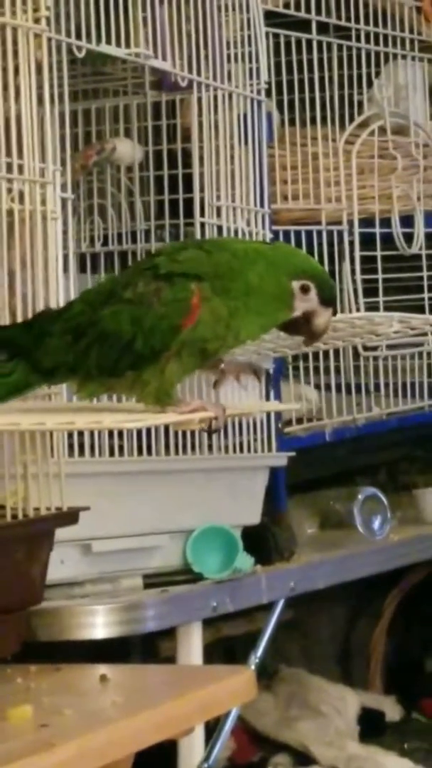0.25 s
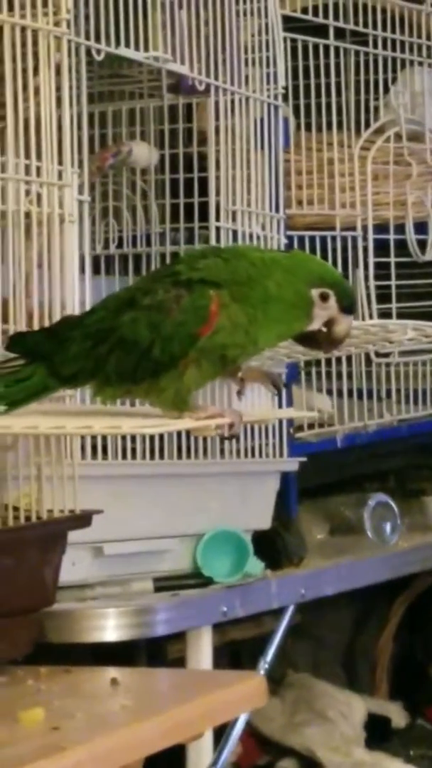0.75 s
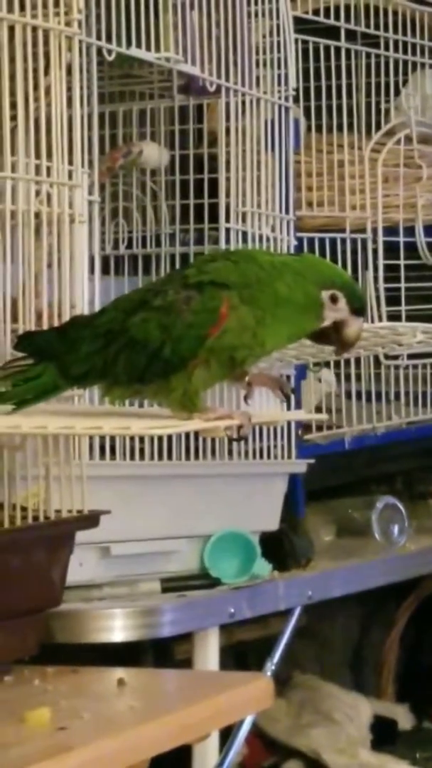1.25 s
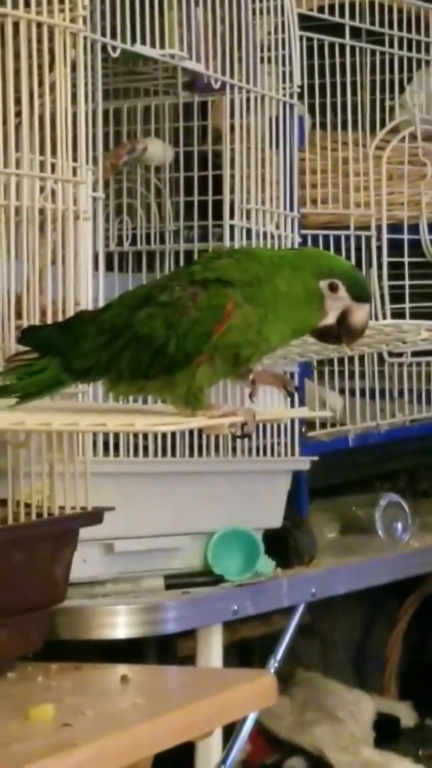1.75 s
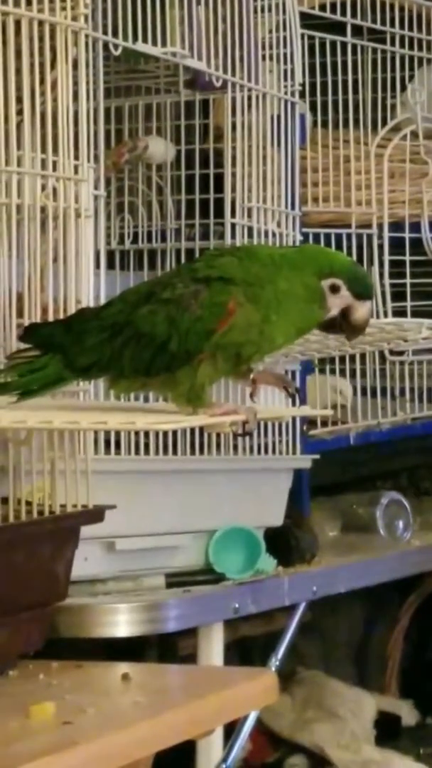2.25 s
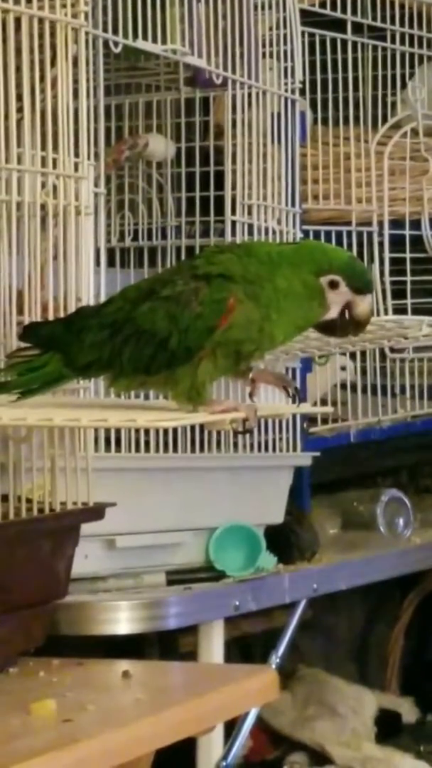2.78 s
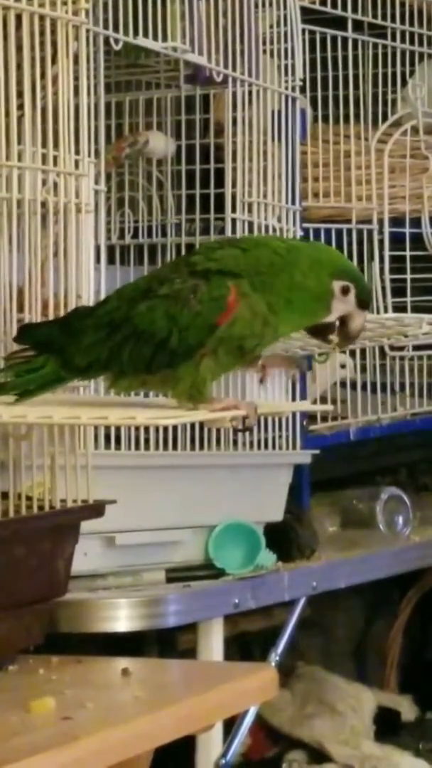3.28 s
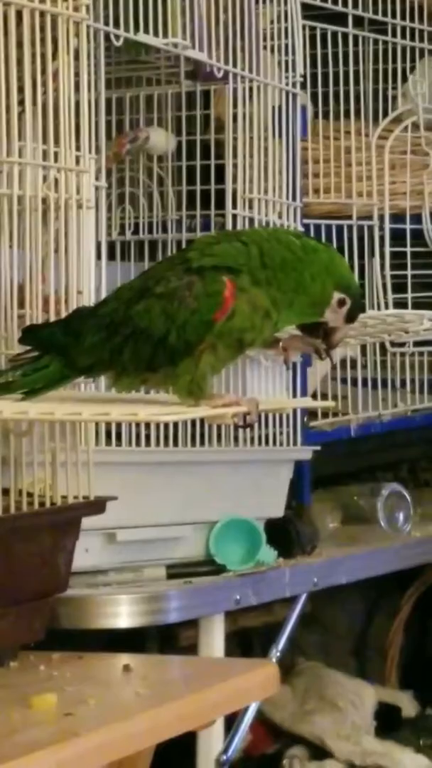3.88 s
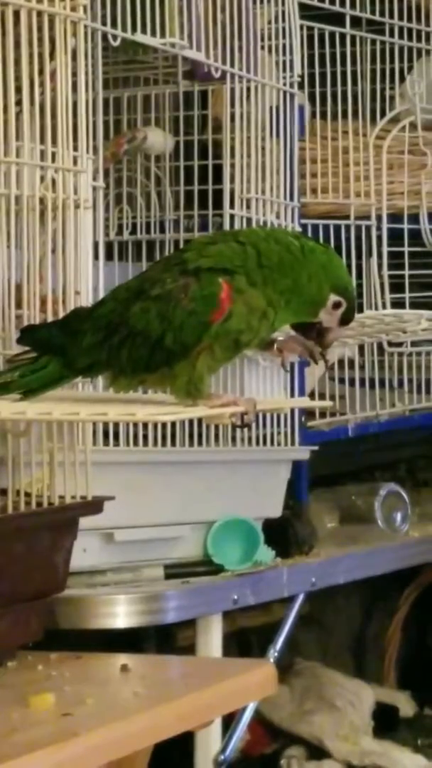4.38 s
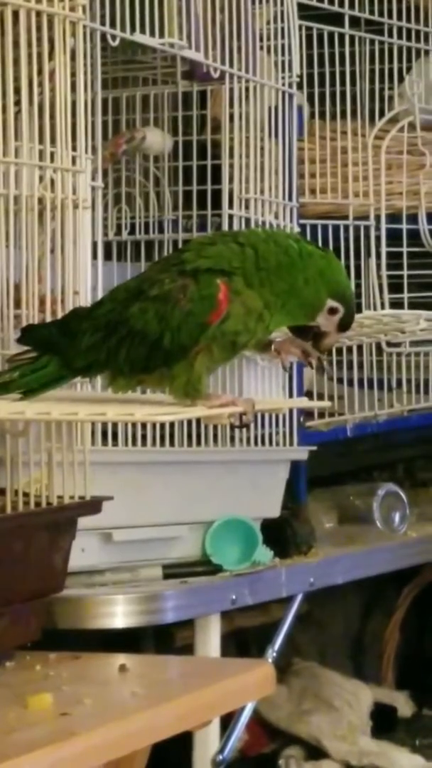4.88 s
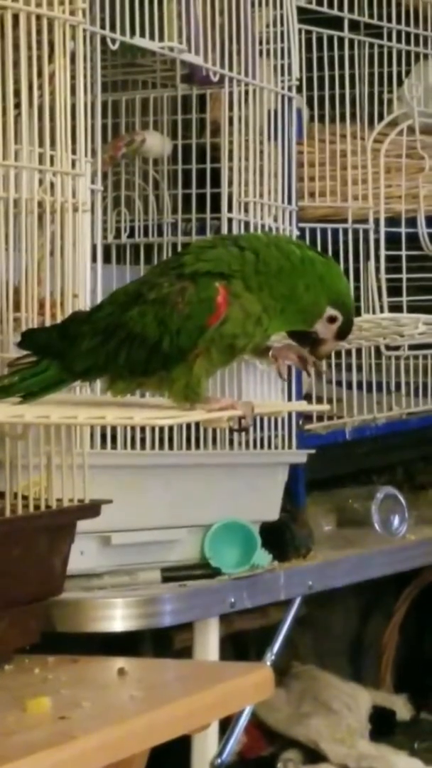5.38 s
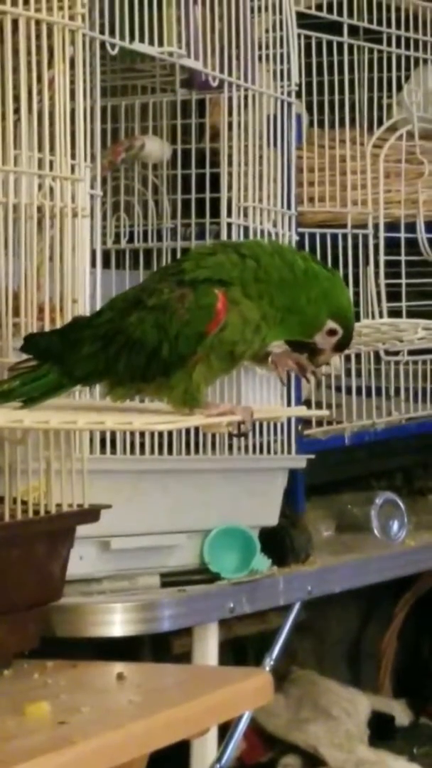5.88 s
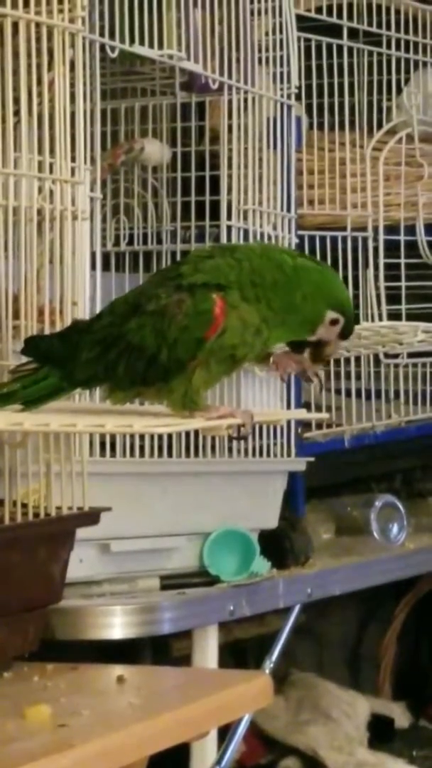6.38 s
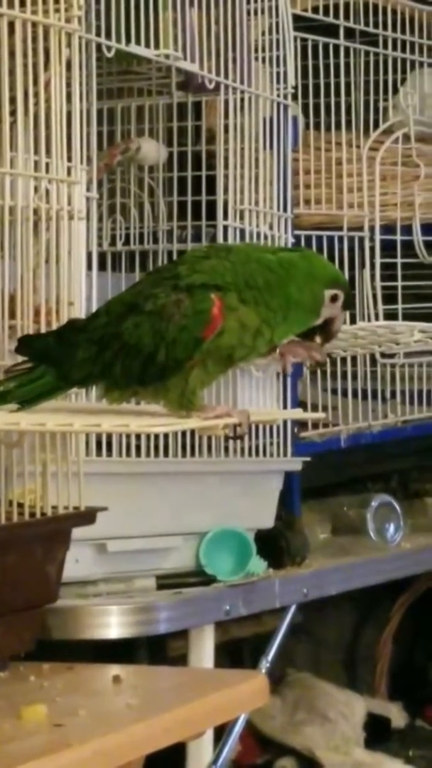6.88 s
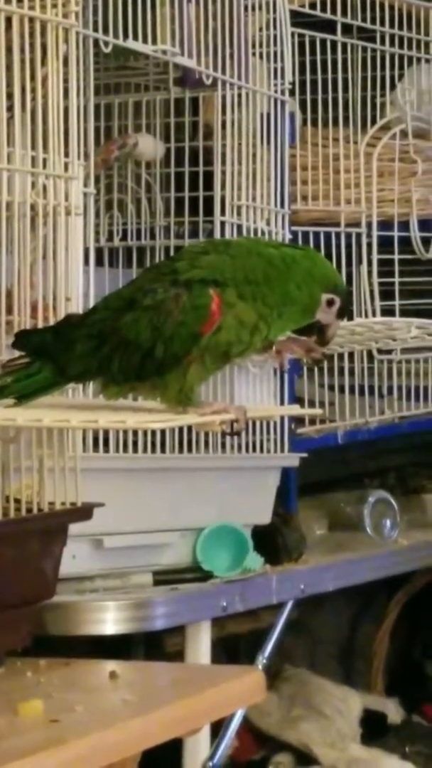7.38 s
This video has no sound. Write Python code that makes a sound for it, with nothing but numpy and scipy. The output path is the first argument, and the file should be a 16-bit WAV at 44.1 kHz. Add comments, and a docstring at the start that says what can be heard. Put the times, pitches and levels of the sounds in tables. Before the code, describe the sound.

Stereo, close view of a parrot eating in a quiet room with a low distant hum. Dry husk crackles and tiny beak ticks come irregularly, the sharpest tick near three seconds. A dove, coloured by the room's resonance, finishes one coo and then calls three times: short hoot, soft intake, long rolling coo. A loud perch knock lands during the last short hoot, and a scraping crack closes.

```python
"""A room of bird cages: air and a far machine hum run throughout; the end of a dove's coo opens the scene.
Three calls follow, each a short falling note, a faint in-drawn hum and a long throbbing coo: a near sine
whose pitch crosses the room's resonances. Around them a parrot near the microphones cracks seeds, knocks
and ticks (noise bursts, short sines), and after 5 s strikes its perch hard, ringing decaying modes and cage.
Noise bursts are cut off at set lengths; the dove's ringing is shut off once weak."""
import sys
import numpy as np
from scipy import signal
from scipy.fft import rfft, irfft
from scipy.io import wavfile
from scipy.ndimage import uniform_filter1d

SR = 44100
rng = np.random.default_rng(int(sys.argv[2]) if len(sys.argv) > 2 else 0)


def master(y):
    """Save y as 16-bit WAV."""
    cut = np.clip(np.atleast_2d(y).T, -1, 1)
    pcm = np.round(cut * 32767)  # scale
    wavfile.write(sys.argv[1], SR, pcm.astype(np.int16))


N = 336924

# short dove notes: start t/s, time stretch/1, pitch shift/Hz, level shift/dB
SHORT_NOTES = [(1.044, 0.953, 18.65, -0.059), (3.196, 0.869, 12.56, 1.23), (5.416, 0.89, 14.28, 2.664)]


def amp(db):
    """Decibels to gain."""
    return 10 ** (np.asarray(db) / 20)


def evened(x):
    """Scales to rms 1."""
    return x / np.sqrt(np.mean(x ** 2) + 1e-20)


def read(points, hz):
    """Interpolates a table on a log-frequency axis."""
    f, value = np.transpose(points)
    return np.interp(np.log(hz + 1), np.log(f + 1), value)


def sides(pan_db):
    """Left and right gains for a left-right level difference."""
    return amp(np.array([pan_db / 2, -pan_db / 2]))


def add(mix, start_s, sound):
    """Mixes a two-channel sound in at a start time."""
    part = mix[:, max(round(start_s * SR), 0):][:, :sound.shape[1]]
    part += sound[:, :part.shape[1]]


def burst(colour, t60_s, length_s, rise_s, same, lumpy_db=3.5):
    """Noise of uneven colour and flickering level that rises, dies away and is cut off at its length."""
    grain_db, fade_s = 2, .005
    t = np.arange(12288) / SR
    a, b, grain, lumps = rng.standard_normal((4, len(t)))
    pair = np.array([a, same * a + np.sqrt(1 - same ** 2) * b])  # same: left-right likeness
    hz = np.fft.rfftfreq(len(t), 1 / SR)
    uneven = amp(lumpy_db * evened(uniform_filter1d(lumps, 45))[:len(hz)])
    noise = evened(irfft(rfft(pair) * colour(hz) * uneven, len(t)))
    flicker = amp(grain_db * evened(uniform_filter1d(grain, 120)))
    rise = np.minimum(t / max(rise_s, 1e-4), 1)
    decay = amp(-60 * t / t60_s)
    cut = 1 / (1 + np.exp(np.clip((t - length_s) / fade_s, -30, 30)))
    return noise * flicker * rise * decay * cut


def air():
    """Room air: random short-time spectra in drifting patches, none below 120 Hz."""
    # spectrum of the air: f/Hz, relative density level/dB
    air_spectrum = [(65, -28), (110, 2), (124, -14), (146, -1), (266, -8.5), (294, -5), (375, -24),
                    (398, -13), (496, -17.5), (907, -28.5), (1500, -32), (11400, -40), (13400, -37)]
    # left-right likeness: f/Hz, likeness/1
    air_likeness = [(60, 1), (200, .996), (400, .98), (700, .8), (1300, .46), (13000, .48)]
    level_db, patchy_db = -62.3, 2.2
    frames, hz = N // 256 + 5, np.fft.rfftfreq(1024, 1 / SR)
    a, b, c, d, patches = rng.standard_normal((frames, 513, 5)).T
    patches = evened(uniform_filter1d(uniform_filter1d(patches, 4, 0), 5, 1))
    same = np.clip(read(air_likeness, hz), -1, 1)[:, None]
    left = a + 1j * b
    right = same * left + np.sqrt(1 - same ** 2) * (c + 1j * d)
    gain = amp(read(air_spectrum, hz)[:, None] + patchy_db * patches) * (hz > 120)[:, None]
    pair = signal.istft(np.array([left, right]) * gain, nperseg=1024, noverlap=768)[1][:, :N]
    return amp(level_db) * evened(pair)


def hum():
    """Far machine: sines whose pitch and level waver at random, over soft low-passed rumble."""
    # hum lines: f/Hz, level/dB, waver/Hz (rms; the same number is the level swell in dB)
    hum_lines = [(59, -60.5, .4), (99.2, -65.5, 1.6), (209, -78, 2.1), (296.7, -70.5, 1.8), (410, -80, 4.9),
                 (502, -79, 4.6)]
    rumble_db = -72.5
    hz, out = np.fft.rfftfreq(N, 1 / SR), np.zeros(N)
    waver_band = (hz > 1.5) * (hz < 25)
    for f, db, waver_hz in hum_lines:
        swell, drift = (evened(irfft(rfft(v) * waver_band, N)) for v in rng.standard_normal((2, N)))
        phase = 2 * np.pi * np.cumsum(f + waver_hz * drift) / SR
        out += amp(db + waver_hz * swell) * np.sqrt(2) * np.sin(phase)
    rumble_colour = (hz > 20) * (hz < 125) * (hz / 60) ** 0.65
    rumble = irfft(rfft(rng.standard_normal(N)) * rumble_colour, N)
    return out + amp(rumble_db) * evened(rumble)


def melody():
    """Lays the shared note shapes out call by call; returns one table (t/s, f/Hz, level/dB) a note."""
    # short note before stretch and shifts: t/s after start, f/Hz, level/dB
    short_shape = [(0.002, 535.2, -44.76), (0.023, 606.3, -15.47), (0.036, 693.6, -31.22),
                   (0.06, 658.5, -32.66), (0.118, 635.9, -22.72), (0.222, 593.8, -20.77),
                   (0.229, 545.1, -32.28), (0.298, 533.5, -54.13)]
    # long coo climbing to its pitch: t/s after start, f/Hz, level/dB
    climb_shape = [(-0.007, 429.0, -54.46), (0.022, 443.3, -34.17), (0.084, 468.8, -28.77),
                   (0.096, 462.2, -33.99), (0.112, 503.5, -28.77), (0.143, 476.9, -36.75),
                   (0.151, 555.8, -22.95), (0.171, 606.4, -16.1)]
    # long coo dropping away: t/s after drop begins, pitch shift/Hz, level shift/dB
    drop_shape = [(-0.017, -19.34, 8.045), (0.03, -48.18, -4.969), (0.033, -107.8, -11.37),
                  (0.048, -102.2, -19.53), (0.101, -111.7, -19.91), (0.108, -143.9, -32.71),
                  (0.154, -166.4, -44.77)]
    # long coos: start t/s, crest t/s, f/Hz, level/dB, bend t/s, f/Hz, drop t/s, f/Hz, level/dB
    coos = [(-0.81, -0.25, 620.0, -8.974, -0.094, 582.4, 0.086, 596.6, -20.79),
            (1.474, 2.019, 624.3, -14.39, 2.27, 590.9, 2.366, 594.6, -19.14),
            (3.608, 4.225, 612.6, -15.07, 4.282, 603.1, 4.464, 593.5, -19.7),
            (5.834, 6.384, 618.0, -15.02, 6.598, 602.3, 6.694, 596.9, -21.89)]
    notes = [np.array(short_shape) * [stretch, 1, 1] + [s, hz, db] for s, stretch, hz, db in SHORT_NOTES]
    for s, crest_s, crest_hz, crest_db, bend_s, bend_hz, drop_s, drop_hz, drop_db in coos:
        climb = np.add(climb_shape, [s, 0, 0])
        hold = [(crest_s, crest_hz, crest_db), (bend_s, bend_hz, (crest_db + drop_db) / 2)]
        drop = np.add(drop_shape, [drop_s, drop_hz, drop_db])
        notes.append(np.vstack([climb, hold, drop]))
    return sorted(notes, key=lambda note: note[0, 0])


def resonate(x, hz, width_hz):
    """One fixed resonance of gain 1, at least 7 Hz wide, for a complex tone."""
    pole = np.exp((2j * hz - max(width_hz, 7)) * np.pi / SR)
    return signal.lfilter([1 - abs(pole)], [1, -pole], x)


def room(x):
    """Direct sound plus ringing modes, different at each microphone."""
    # modes around the coo: f/Hz, width/Hz (7 at least), left gain/1, right gain/1; sign = polarity
    room_modes = [(444.4, 7.103, 0.832, 0.468), (465.0, 9.833, -0.337, -1.088),
                  (475.7, 6.861, 1.381, 0.867), (500.0, 6.568, 2.051, 3.225), (515.9, 22.26, 1.744, 2.358),
                  (543.1, 11.9, 1.047, 1.504), (568.2, 29.54, 0.903, 0.693), (589.8, 18.62, 0.997, 1.296),
                  (607.0, 15.37, 0.063, -0.146), (626.4, 23.88, 0.689, 0.797), (648.0, 21.1, 0.831, 1.131),
                  (671.2, 7.044, 1.013, 1.155), (684.2, 11.1, 3.267, 3.131), (718.9, 24.26, 0.485, 0.805)]
    # direct sound: left and right level/dB
    direct_db = [-3.3, -7.6]
    turn_rad, lag_rad = 2.57, -.3  # ahead of the ring; half the left-right phase offset
    phase = turn_rad + np.array([-lag_rad, lag_rad])
    out = np.outer(amp(direct_db) * np.exp(1j * phase), x)
    for hz, width_hz, left, right in room_modes:
        out += np.outer([left, right], resonate(x, hz, width_hz))
    return out


def dove():
    """Near sine, throbbing as it crosses room modes; a 100-per-second flutter, octave and breath ride on it."""
    # rolling pitch sags: t/s, depth/Hz (negative lifts), 1/e half-width/s
    sags = [(1.667, 15.23, 0.023), (1.722, 61.75, 0.009), (1.779, 58.95, 0.014), (1.833, 67.0, 0.01),
            (1.906, 128.6, 0.013), (1.978, 98.64, 0.018), (2.122, 62.17, 0.014), (2.159, 95.51, 0.017),
            (3.803, 36.97, 0.014), (3.861, 61.32, 0.008), (3.915, 57.81, 0.01), (3.981, 83.5, 0.012),
            (4.048, 120.0, 0.013), (4.083, 24.37, 0.005), (4.129, 120.2, 0.016), (6.063, 34.97, 0.034),
            (6.096, -14.2, 0.009), (6.134, 76.53, 0.008), (6.197, 46.69, 0.018), (6.261, 144.5, 0.011),
            (6.293, 25.72, 0.007), (6.344, 142.8, 0.009)]
    # flutter tones at 100 Hz steps, strongest near 588 Hz: offset f/Hz (sign also sets polarity)
    flutter_offsets = [-300, -200, -100, 100, 200, 300, 400]
    # their strongest levels, relative to the tone: level/dB
    flutter_levels = [-46, -45, -23, -25, -53.5, -38.5, -53.5]
    # breath skirt around the tone: offset f/Hz, relative level/dB
    breath_skirt = [(1, -0.5), (90, -1), (250, -11), (600, -33), (1500, -56)]
    sag_loss_db_per_hz, waver_hz = .15, 1.5
    flutter_hz, flutter_width_hz = 588, 38  # coo pitch of strongest flutter; 1/e half-width
    octave_db, breath_db = -58, -32
    tail_db, tail_s = -45.5, .03  # ringing under this power is shut off; averaging time
    notes, t = melody(), np.arange(N) / SR
    note_s, note_hz, note_db = np.vstack(notes).T
    sag = sum(depth_hz * np.exp(-((t - at_s) / half_s) ** 2) for at_s, depth_hz, half_s in sags)
    hz = np.interp(t, note_s, note_hz) - sag
    db = np.interp(t, note_s, note_db) - sag_loss_db_per_hz * sag
    sounding = sum((t >= note[0, 0]) & (t < note[-1, 0]) for note in notes) > 0
    level = np.sqrt(2) * amp(db) * uniform_filter1d(sounding * 1., 300)
    waver = evened(uniform_filter1d(uniform_filter1d(rng.standard_normal(N), 500), 500))
    turn = np.exp(2j * np.pi * np.cumsum(hz + waver_hz * waver) / SR)

    skirt = amp(read(breath_skirt, np.fft.rfftfreq(N, 1 / SR)))
    breath = evened(irfft(rfft(rng.standard_normal((2, N))) * skirt, N))
    near = np.exp(-((hz - flutter_hz) / flutter_width_hz) ** 2)
    flutter = sum(amp(d) * np.sign(f) * np.exp(2j * np.pi * f * t)
                  for f, d in zip(flutter_offsets, flutter_levels))
    riders = 1 + near * flutter + amp(octave_db) * turn + amp(breath_db) * (breath[0] + 1j * breath[1])

    ringing = room(level * turn)
    power = uniform_filter1d((abs(ringing) ** 2).mean(0), round(tail_s * SR))
    gate = power / (power + amp(2 * tail_db))
    return (ringing * riders).real * gate


def seed_cracks():
    """Bright husk noise; a harder crack starts and dies faster."""
    # cracks: t/s, level/dB before the envelope, left-right/dB, length/s, tilt/dB per octave about 8.5 kHz
    cracks = [(.001, -55, -4, .13, -3), (.044, -54.5, -1, .11, 0), (.504, -58, -2.5, .098, 3),
              (.642, -68, -4, .11, 7), (1.015, -62, -1, .072, -7), (1.378, -72.5, -8, .051, 16),
              (1.492, -49.5, -1.5, .12, -2), (1.64, -70, -9, .08, 12), (2.726, -63, -1, .076, 9),
              (2.827, -62, -3, .12, -3), (2.927, -51.5, -3, .023, 4), (2.956, -52.5, 0, .098, 4),
              (3.041, -54.5, -2, .18, 4.5), (4.47, -65, -4, .078, 6.5), (4.608, -65.5, -7.5, .06, 3),
              (4.985, -59, -1, .066, 8), (5.011, -52.5, 5, .099, 21), (5.066, -53.5, 0, .12, 5),
              (5.165, -61.5, 8, .22, 6), (6.182, -46, -2, .11, -3), (6.379, -70, -3.5, .077, 14.5),
              (7.235, -65.5, -4, .082, 6), (7.45, -56, -4, .17, .5), (7.537, -44, 0, .11, -3)]
    # husk colour: f/Hz, relative density level/dB
    husk_spectrum = [(3500, -50), (4700, -40.5), (4950, -12), (5250, -7.5), (6700, -6), (7900, -4),
                     (8700, -11), (9300, -15), (9900, -8), (12200, -6), (13000, -6)]
    top_hz, same = 13080, .85
    rise_s, t60_s = .008, .48  # at -55 dB
    rise_shrink_db_per_db, t60_shrink_db_per_db = .5, .45
    out = np.zeros((2, N))
    for s, db, pan_db, length_s, tilt_db in cracks:
        rise = rise_s * amp(-rise_shrink_db_per_db * (db + 55))
        t60 = t60_s * amp(-t60_shrink_db_per_db * (db + 55))

        def husk(f):
            """Tilted husk colour below its top."""
            return amp(read(husk_spectrum, f) + tilt_db * np.log2((f + 1) / 8500)) * (f < top_hz)

        add(out, s, amp(db) * sides(pan_db)[:, None] * burst(husk, t60, length_s, rise, same))
    return out


def resonant_burst(db, hz, width_hz, pan_db, length_s, rise_s):
    """Noise burst around one broad resonance."""
    same, t60_lengths = .8, 3.8  # left-right likeness; t60 in lengths, before the cut

    def body(f):
        """Flat-topped resonance."""
        return 1 / (1 + (2 * (f - hz) / width_hz) ** 4)

    return amp(db) * sides(pan_db)[:, None] * burst(body, t60_lengths * length_s, length_s, rise_s, same)


def resonant_bursts():
    """Resonant noise bursts: knocks, scrapes, soft swells into loud blows, a click as the dove's voice catches."""
    # bursts (swells at 5.004 and 7.525 s, voice click at 2.16 s):
    # t/s, level/dB before the envelope, f/Hz, width/Hz, left-right/dB, length/s, rise/s
    burst_rows = [(.039, -62.5, 1490, 1203, -3.5, .034, .01), (.471, -72, 2530, 490, 7, .048, .0056),
                  (.512, -63.5, 2520, 600, 9, .07, .006), (1.199, -56.5, 2325, 505, 1, .02, .0042),
                  (1.219, -47, 2480, 605, 5.5, .035, .0084), (1.49, -58.5, 1052, 1170, 4, .12, .004),
                  (1.577, -51, 1370, 614, 4, .066, .046), (2.16, -56, 1514, 3500, -2, .02, .004),
                  (4.579, -56, 1633, 910, 7, .065, .0063), (4.624, -58, 1644, 900, 9, .04, .004),
                  (4.941, -59.5, 1580, 900, 2.5, .022, .0034), (5.004, -52.5, 1645, 1400, 8.5, .11, .052),
                  (5.055, -45, 2050, 2000, 5, .115, .006), (5.058, -54, 4350, 1600, 8, .1, .013),
                  (5.164, -62.5, 2040, 1600, 8.5, .26, .005), (6.184, -64.5, 1976, 2400, 3.5, .046, .0031),
                  (7.08, -59.5, 806, 800, -5, .04, .006), (7.449, -65.5, 2440, 1190, 6, .097, .0048),
                  (7.525, -41, 2000, 2320, 9.5, .088, .018), (7.542, -47, 3400, 2400, 10, .08, .004)]
    out = np.zeros((2, N))
    for s, *row in burst_rows:
        add(out, s, resonant_burst(*row))
    return out


def onset_clicks():
    """A click opens each short dove note, growing quickly with the note's level."""
    delay_s, level_db, db_per_db = .011, -59, 3.6
    out = np.zeros((2, N))
    for s, _, _, shift_db in SHORT_NOTES:
        click = resonant_burst(level_db + db_per_db * shift_db, hz=1450, width_hz=2900,
                               pan_db=-4, length_s=.02, rise_s=.004)
        add(out, s + delay_s, click)
    return out


def indraws():
    """Faint wavering tone that creeps up toward the long coo."""
    # in-drawn hums: start t/s, length/s, start f/Hz, mean level/dB
    indraw_rows = [(1.31, .17, 380, -58), (3.44, .17, 380, -59), (5.67, .16, 378, -57)]
    glide_hz, waver_db, pan_db = 35, 4, 2.5
    out = np.zeros((2, N))
    for s, length_s, hz, db in indraw_rows:
        u = np.arange(0, 1, 1 / (length_s * SR))
        waver = evened(uniform_filter1d(uniform_filter1d(rng.standard_normal(8000), 700), 700))[:len(u)]
        tone = np.sin(2 * np.pi * np.cumsum(hz + glide_hz * u) / SR) * signal.windows.tukey(len(u), .3)
        add(out, s, np.outer(sides(pan_db), np.sqrt(2) * amp(db + waver_db * waver) * tone))
    return out


def beak_ticks():
    """Sharp ticks: high sines under a sub-millisecond Gaussian."""
    # ticks: t/s, peak level/dB, f/Hz, left-right/dB
    ticks = [(1.4961, -48.5, 6010, -0.5), (2.9248, -44, 12400, 3), (2.9324, -39, 12500, -2),
             (2.9386, -31.5, 12850, -1), (2.9467, -16, 11750, 5), (2.9617, -31.5, 11600, 8),
             (2.9824, -41, 12900, 0), (2.9906, -35, 12700, 3), (3.019, -46, 11840, 2.0),
             (3.0329, -28, 12000, 2), (6.1878, -37, 6760, -6.5), (7.5354, -24.5, 7340, 4.5)]
    centre_s, half_s = .0006, .00024
    out, t = np.zeros((2, N)), np.arange(4000) / SR
    for s, db, hz, pan_db in ticks:
        tick = np.sin(2 * np.pi * hz * t) * np.exp(-((t - centre_s) / half_s) ** 2)
        add(out, s, amp(db) * np.outer(sides(pan_db), tick))
    return out


def perch_blow():
    """Hardest blow: decaying perch modes, then noise coloured by the cage's resonances."""
    # perch modes: f/Hz, initial level/dB before onset and high-pass, t60/s
    perch_modes = [(183, -26, 0.029), (330, -11, 0.017), (467, -18.5, 0.046), (973, -23, 0.022),
                   (1597, -18, 0.033)]
    # cage resonances: f/Hz, width/Hz, relative level/dB
    cage_modes = [(1215, 130, -9), (1634, 125, -5), (1710, 150, -5), (2370, 150, -2.5), (3050, 200, -15.5)]
    blow_s, blow_pan_db, onset_s = 5.0535, 1, .00028
    cage_db, cage_pan_db = -38, 6.9
    out, t = np.zeros((2, N)), np.arange(4000) / SR
    modes = sum(amp(db - 60 * t / t60_s) * np.sin(2 * np.pi * hz * t) for hz, db, t60_s in perch_modes)
    blow = modes * (1 - np.exp(-(t / onset_s) ** 2))
    # high-pass keeps the blow free of deep bass
    blow = signal.sosfilt(signal.butter(3, 140, "high", fs=SR, output="sos"), blow)
    add(out, blow_s, np.outer(sides(blow_pan_db), blow))

    def cage(f):
        """Summed cage resonances."""
        return sum(amp(db) / (1 + (2 * (f - hz) / width_hz) ** 2) for hz, width_hz, db in cage_modes)

    ring = burst(cage, t60_s=.6, length_s=.105, rise_s=.0046, same=.84, lumpy_db=0)
    add(out, blow_s, amp(cage_db) * sides(cage_pan_db)[:, None] * ring)
    return out


def scene():
    """Sums the room air, machine, dove and parrot."""
    background = air() + hum()
    calls = dove() + onset_clicks() + indraws()
    impacts = seed_cracks() + resonant_bursts() + beak_ticks() + perch_blow()
    return background + calls + impacts


def record(dry):
    """Band limit: linear-phase low-pass."""
    edge_hz = 13350
    low_pass = signal.firwin(511, edge_hz, window=("kaiser", 9), fs=SR)
    return signal.oaconvolve(dry, low_pass[None], "same")


dry = scene()
out = record(dry)
master(out)
```